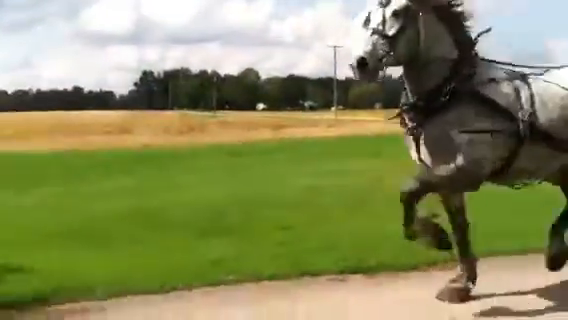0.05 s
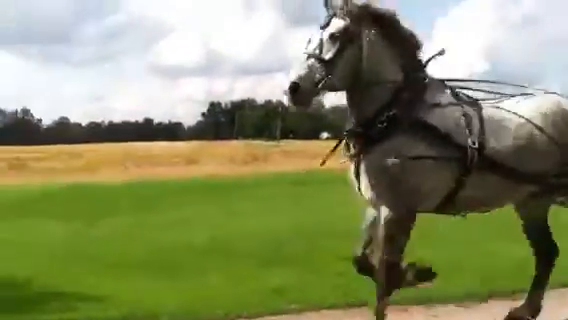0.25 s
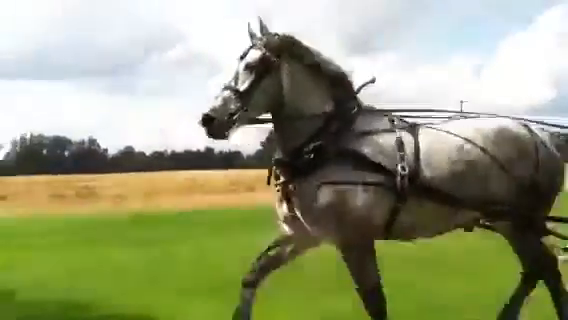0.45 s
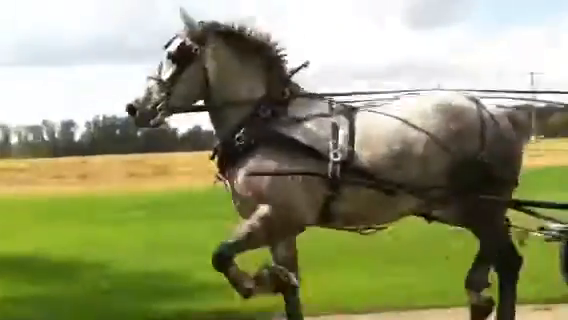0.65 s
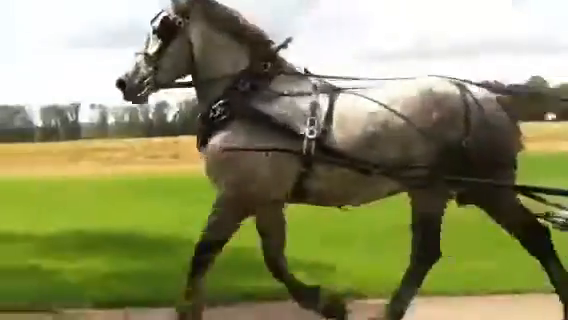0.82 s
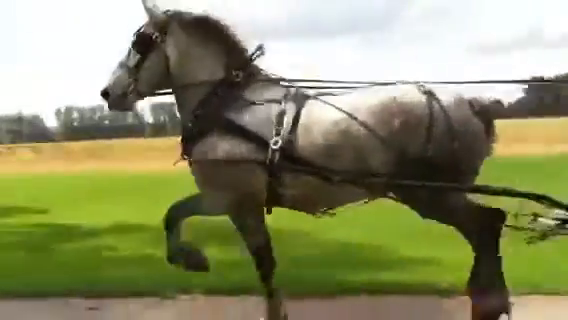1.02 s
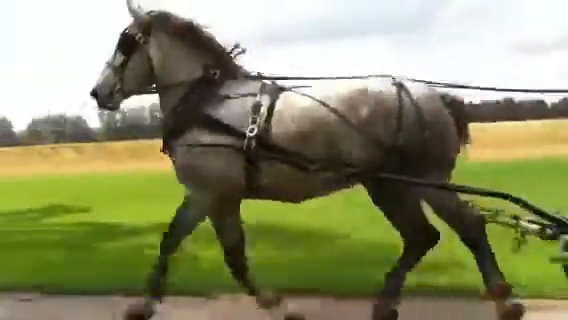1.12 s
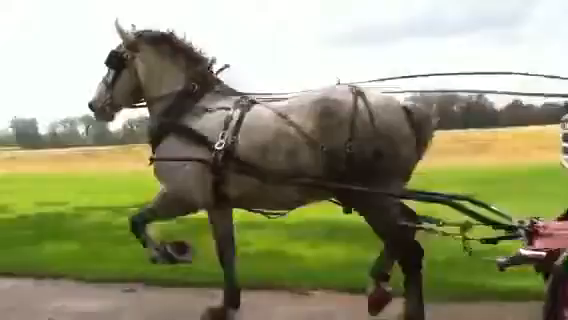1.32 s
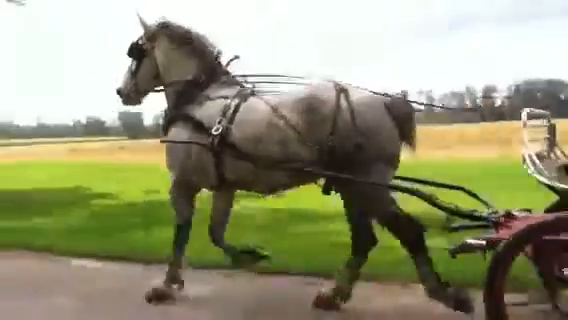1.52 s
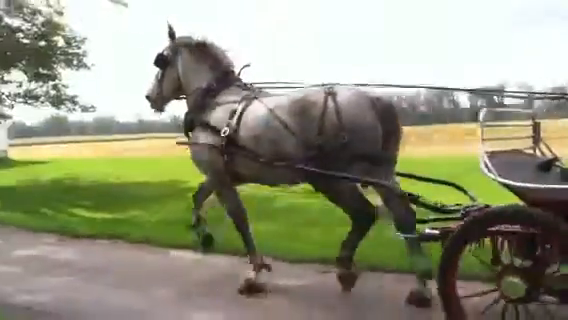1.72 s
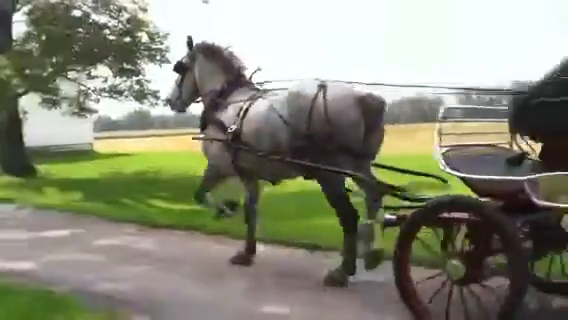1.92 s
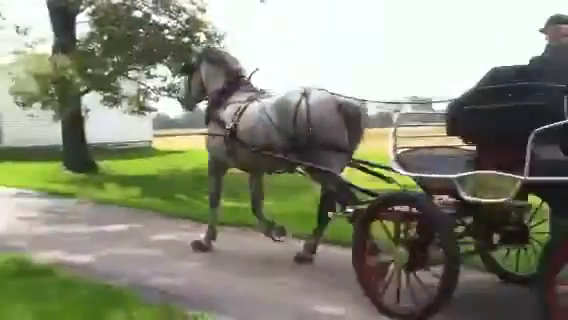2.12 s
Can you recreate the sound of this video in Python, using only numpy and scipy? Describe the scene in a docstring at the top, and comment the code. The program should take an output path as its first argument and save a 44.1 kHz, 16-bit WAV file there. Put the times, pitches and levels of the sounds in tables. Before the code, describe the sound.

Sharp trotting hoofbeats on a paved lane, over light harness jingle and steady wheel noise.

```python
"""Clip-clop: a horse in harness trots past on a paved lane, pulling a carriage. Each beat is a few quick hoof
contacts: a hollow knock, a clack of the hoof wall, a thud, a gritty tail. Small metal pieces on the harness
bump together, jingling and clinking with the stride. Underneath, the wheels roll steadily and crunch over small
grains. This background rumble dips briefly around 0.4 s and 1.7 s."""
import sys
import numpy as np
from scipy import signal
from scipy.fft import rfft, irfft, next_fast_len
from scipy.io import wavfile
from scipy.ndimage import uniform_filter1d, map_coordinates

SR = 44100
rng = np.random.default_rng(int(sys.argv[2]) if len(sys.argv) > 2 else 0)


def materialize(psi):
    """Save the field psi as 16-bit PCM at rate SR to the path in sys.argv[1].

    A 1-D psi becomes a single channel; in a 2-D psi each row is a channel.
    """
    bounded = np.clip(np.atleast_2d(psi).T, -1, 1)
    quanta = np.round(bounded * 32767).astype(np.int16)
    wavfile.write(sys.argv[1], SR, quanta)


N = 94815
T = np.arange(N) / SR

# Levels are relative. A mode is one of the tones an object rings with.
# hooves landing: t/s, hollow f/Hz, hollow level/dB, wall f/Hz, wall level/dB, thud level/dB
HOOF_CONTACTS = [(0.2271, 1100, -23.5, 1410, -19, -44), (0.2455, 760, -20, 1360, -24, -34.5),
                 (0.258, 894, -16.5, 1930, -25, -29.5), (0.2779, 961, -6.5, 1910, -15, -23.5),
                 (.5890, 820, -39, 2060, -35, -39), (.6040, 929, -8.5, 1830, -19, -61),
                 (0.6079, 696, -14.5, 2370, -20.5, -34), (0.6252, 970, -26.5, 1850, -28.5, -37.5),
                 (.8708, 930, -25.5, 2100, -25, -36), (0.8821, 916, -17.5, 1980, -42, -60),
                 (0.9122, 880, -49, 2300, -19, -32.5), (0.9326, 1013, -10, 2130, -11, -38),
                 (.9349, 707, -13.5, 2880, -11, -44), (1.22, 830, -22, 2170, -19.5, -41),
                 (1.2431, 735, -14.5, 1760, -23.5, -35), (1.2445, 1140, -13, 2120, -31, -56),
                 (1.2468, 716, -58, 2100, -14.5, -35.5), (1.2525, 1050, -19.5, 2190, -20, -41),
                 (1.2665, 940, -25, 1900, -30, -61), (1.5119, 870, -31, 2230, -25, -45),
                 (1.533, 845, -25.5, 1800, -31, -43), (1.567, 950, -30, 2360, -30, -37),
                 (1.5863, 835, -16, 1744, -10.5, -35.5), (1.868, 880, -36, 1880, -27, -43.5),
                 (1.8907, 810, -14, 2170, -18, -50), (1.8934, 784, -19.5, 2150, -15, -51),
                 (1.913, 820, -38, 1900, -46, -64)]
# modes of the hollow under the hoof: pitch ratio, level/dB, swell/s
KNOCK_MODES = [(0.991, 0.5, 0.0014), (1.4, -14.5, 0.002)]
# modes of the hard hoof wall: pitch ratio, level/dB, swell/s
CLACK_MODES = [(0.916, 4, 0.00061), (1.2, -11.5, 0.0017), (0.677, 1, 0.00038)]
# modes of the thud into the ground: f/Hz, level/dB, swell/s
GROUND_MODES = [(154.3, -3.5, 0.008), (257, -1, 0.0039), (473, 3, 0.0018)]
# gritty tail of a contact: f/Hz, level/dB
TAIL_SPECTRUM = [(60, -36), (250, -0.5), (520, -6), (900, 11.5), (2300, 0), (3500, -4), (6500, -9),
                 (14000, -31)]
# sound thrown back by horse and carriage: f/Hz, level/dB
ECHO_SPECTRUM = [(90, -34), (150, 8.5), (350, -5.5), (900, -0.5), (2200, -5.5), (7000, -66)]
# grit cracking under the shoes: t/s, level/dB
GRIT_CRACKS = [(0.259, -17), (0.608, -3), (0.8704, -18), (0.9324, -10), (0.9333, -16), (1.217, -20),
               (1.2459, -4), (1.8678, -21), (1.894, -12.5)]
# tone of a crack: f/Hz, level/dB
GRIT_SPECTRUM = [(100, -76), (2200, 8), (4000, -22), (5600, 3.5), (6400, 3.5), (7800, -9.5), (10000, -15.5),
                 (15000, -49)]
# buckles and straps clinking: t/s, f/Hz, level/dB
BUCKLE_HITS = [(0.042, 5720, -44), (0.0876, 7800, -42.5), (0.131, 7300, -44), (.185, 7860, -43),
               (0.5458, 2180, -43.5), (0.5615, 7800, -44), (0.736, 7520, -38.5), (0.845, 6800, -41),
               (1.0038, 2220, -38), (1.021, 7230, -34.5), (1.2013, 7500, -38.5), (1.331, 2320, -39.5),
               (1.335, 6850, -37), (1.3702, 7000, -38.5), (2.0112, 6840, -47)]
# modes of a buckle: pitch ratio, level/dB
BUCKLE_MODES = [(.8, -3), (0.998, 4.5), (1.13, -16), (1.48, -15)]
# modes of the jingling metal: f/Hz, level/dB, time to fade by 60 dB/s
METAL_MODES = [(4885, -3, .22), (4975, -6, .04), (5085, -5, .1), (5460, -6, .07), (9715, -2, .11),
               (9795, -2, .1), (9880, -8, .03), (10580, -6, .07), (10700, -4, .07), (10850, -12, .04),
               (13330, -10, .06), (13500, -17, .04)]
# rise and fall of the jingle: t/s, level/dB
JINGLE_CURVE = [(0, -62), (.12, -75), (.24, -44), (.34, -56.5), (.45, -65), (.55, -49.5), (.78, -63),
                (.89, -52.5), (1.0, -53), (1.08, -44.5), (1.16, -35.5), (1.24, -42), (1.30, -52.5),
                (1.40, -44.5), (1.48, -35.5), (1.575, -33.5), (1.62, -45.5), (1.765, -46.5), (1.795, -40.5),
                (1.89, -37), (1.98, -58), (2.15, -67.5)]
# noisy rattle within the jingle: f/Hz, level/dB
RATTLE_SPECTRUM = [(500, -50), (3500, -28), (5000, 13), (6500, 0), (8500, -6), (10200, -5.5), (11500, -43),
                   (15000, -40)]
# harder strikes on one piece of metal: t/s, f/Hz, level/dB
METAL_STRIKES = [(1.022, 4660, -45), (1.073, 4900, -35), (1.474, 9710, -27.5), (1.512, 5440, -35),
                 (1.57, 4868, -31), (1.783, 9700, -30.5)]
# wheels and open air: f/Hz, level/dB
ROLL_SPECTRUM = [(30, -1), (70, -18), (110, -1.5), (170, 6), (300, 7), (500, -1), (1200, 5), (2100, -3.5),
                 (3500, -11), (7800, -8.5), (15000, -46)]
# the background rumble rises and falls, with brief dips: t/s, level/dB
BACKGROUND_LEVEL = [(0, -50.5), (.2, -47.5), (.32, -52), (.45, -54.5), (.55, -49.5), (.97, -51),
                    (1.15, -46), (1.3, -50.5), (1.5, -49), (1.62, -51), (1.76, -54), (1.87, -48.5),
                    (2.0, -53.5)]
# grains under the rims: f/Hz, level/dB
CRUNCH_SPECTRUM = [(700, -1), (2100, 12), (3800, -7), (7500, -12), (10000, -16)]
# how fast the jingle and the background waver: f/Hz, level/dB
WAVER_SPECTRUM = [(3, -11), (25, -0.5), (150, -66)]


def hooves():
    """Each contact rings the hollow sole and hoof wall, thuds, and leaves a gritty tail and echoes."""
    sole_hz, sole_db = 887, -24.5  # the sole rings on after the knock
    tail_db, echo_db = -19.5, -34
    tones, tail_power, echo_power = np.zeros((3, N))
    for s, hollow_hz, hollow_db, wall_hz, wall_db, thud_db in HOOF_CONTACTS:
        for ratio, db, swell_s in KNOCK_MODES:
            add(tones, s, amp(hollow_db + db) * knock(s, hollow_hz * ratio, swell_s))
        for ratio, db, swell_s in CLACK_MODES:
            add(tones, s, amp(wall_db + db) * knock(s, wall_hz * ratio, swell_s))
        for hz, db, swell_s in GROUND_MODES:
            add(tones, s, amp(thud_db + db) * knock(s, hz, swell_s))
        add(tones, s, amp(hollow_db + sole_db) * knock(s, sole_hz, swell_s=0.0055))
        strength = amp(hollow_db) + amp(wall_db)
        add(tail_power, s, (strength ** 0.44 * burst(s, rise_s=0.00089, fall_s=0.0065)) ** 2)
        add(echo_power, s, (strength ** 0.28 * swell(s, swell_s=0.0068)) ** 2)
    tails = amp(tail_db) * np.sqrt(tail_power) * noise(TAIL_SPECTRUM)
    echoes = amp(echo_db) * np.sqrt(echo_power) * noise(ECHO_SPECTRUM)
    return tones + tails + echoes


def grit():
    """Grit cracks under the shoes: bright ticks, each with a faint short tail."""
    loudness = np.zeros(N)
    for s, db in GRIT_CRACKS:
        crack = burst(s, rise_s=0.00085, fall_s=0.0011)
        tail = amp(-37) * burst(s, rise_s=0.00042, fall_s=0.02)
        add(loudness, s, amp(db) * (crack + tail))
    return loudness * noise(GRIT_SPECTRUM)


def harness_jingle():
    """Many tiny collisions keep the metal pieces ringing and rattling."""
    hits = clicks(per_s=2800, spread_db=4.0)
    shimmer = np.zeros(N)
    for hz, db, fade_s in METAL_MODES:
        tone = ring(hits * rng.standard_normal(N), hz, fade_s)
        shimmer += amp(db) * rms_one(ring(tone, hz, fade_s=0.003))  # ringing twice makes it purer
    shimmer /= np.sqrt(uniform_filter1d(shimmer ** 2, size=600) + 1e-3)  # even out the loudness
    loudness = level(JINGLE_CURVE) * waver(depth_db=2)
    rattle = amp(-11.5) * noise(RATTLE_SPECTRUM)
    return loudness * (pass_by(shimmer) + rattle)


def metal_strikes():
    """A harder hit leaves one piece of metal ringing with a clear note above the jingle."""
    out = np.zeros(N)
    for s, hz, db in METAL_STRIKES:
        note = np.sin(2 * np.pi * hz * since(s))
        add(out, s, amp(db) * burst(s, rise_s=0.001, fall_s=0.045) * note)
    return out


def buckle_clinks():
    """Each short rattle of the harness stirs the clashing tones of one buckle."""
    out = np.zeros(N)
    for s, hz, db in BUCKLE_HITS:
        loudness = amp(db) * burst(s, rise_s=0.00027, fall_s=0.014)
        metal = np.zeros_like(loudness)
        for ratio, mode_db in BUCKLE_MODES:
            shaking = rng.standard_normal(len(metal))
            metal += amp(mode_db) * rms_one(ring(shaking, hz * ratio, fade_s=0.0039))
        add(out, s, loudness * rms_one(metal))
    return out


def wheels():
    """Steady rolling noise, with small grains crunching under the rims at many pitches."""
    grains_per_s, ring_cycles, crunch_db = 410, 56, -4
    grain_hz, grain_db = np.transpose(CRUNCH_SPECTRUM)
    pitches = np.geomspace(grain_hz[0], grain_hz[-1], 24)
    grains = np.zeros(N)
    for hz in pitches:
        hits = clicks(grains_per_s / len(pitches), spread_db=0.0)
        grains += amp(np.interp(hz, grain_hz, grain_db)) * ring(hits, hz, ring_cycles / hz)
    crunch = amp(crunch_db) * rms_one(cut_bass(grains, hz=500))
    return level(BACKGROUND_LEVEL) * waver(depth_db=1.38) * (noise(ROLL_SPECTRUM) + crunch)


def pass_by(sound):
    """The pitch sinks a little as the horse comes closer and then moves away (the Doppler effect)."""
    horse_m_per_s, sound_m_per_s, nearest_m, passing_s = 3.3, 343, 4.0, 1.0
    distance_m = np.hypot(nearest_m, horse_m_per_s * (T - passing_s))
    delay_s = (distance_m - nearest_m) / sound_m_per_s
    return map_coordinates(sound, [(T - delay_s) * SR], order=5, mode="mirror")


def amp(db):
    """Turn decibels into a number to multiply by."""
    return 10 ** (np.asarray(db) / 20)


def rms_one(x):
    """Scale a sound so that its average strength (rms) is 1."""
    return x / np.sqrt(np.mean(x ** 2) + 1e-20)


def noise(spectrum):
    """Noise of strength 1, its tone shaped by (f/Hz, level/dB) points."""
    hz, db = np.transpose(spectrum)
    size = next_fast_len(N)
    f = np.maximum(np.fft.rfftfreq(size, 1 / SR), 1)
    gain = amp(np.interp(np.log(f), np.log(hz), db))
    white = rfft(rng.standard_normal(N), size)
    return rms_one(irfft(white * gain, size)[:N])


def level(curve):
    """Loudness over time, joining up (t/s, level/dB) points."""
    return amp(np.interp(T, *np.transpose(curve)))


def waver(depth_db):
    """A quick, random wobble in loudness."""
    return amp(depth_db * noise(WAVER_SPECTRUM))


def since(s):
    """Seconds gone by since time s, for one short sound of 8192 samples."""
    return (np.arange(8192) + np.ceil(s * SR)) / SR - s


def burst(s, rise_s, fall_s):
    """A loudness shape that jumps up and fades."""
    return (1 - np.exp(-since(s) / rise_s)) * np.exp(-since(s) / fall_s)


def swell(s, swell_s):
    """A loudness shape that grows to 1 in swell_s seconds and dies away."""
    age = since(s) / swell_s
    return age * np.exp(1 - age)


def knock(s, hz, swell_s):
    """A tone that dies after only a few vibrations."""
    return swell(s, swell_s) ** 2 * np.sin(2 * np.pi * hz * since(s))


def clicks(per_s, spread_db):
    """Clicks at random times; spread_db makes their sizes uneven."""
    sizes = amp(spread_db * np.minimum(rng.exponential(1, N), 4))
    signs = rng.choice([-1, 1], N)
    return sizes * signs * (rng.random(N) < per_s / SR)


def ring(hits, hz, fade_s):
    """Each hit starts a tone that fades by 60 dB in fade_s seconds."""
    decay = np.exp(-np.log(1000) / (fade_s * SR))
    angle = 2 * np.pi * hz / SR
    return signal.lfilter([0, np.sin(angle)], [1, -2 * decay * np.cos(angle), decay ** 2], hits + 1e-18)


def cut_bass(sound, hz):
    """Weaken everything below hz."""
    return signal.sosfilt(signal.butter(2, hz, "high", fs=SR, output="sos"), sound)


def add(out, s, sound):
    """Mix a short sound in at time s."""
    i = int(np.ceil(s * SR))
    out[i:i + len(sound)] += sound[:N - i]


def scene():
    """Horse, harness and carriage together in one channel."""
    return (hooves() + grit() + buckle_clinks() + harness_jingle() + metal_strikes() + wheels())[None]


def record(dry):
    """Thin out the deep bass and cut off the highest treble."""
    top_hz = 15700
    treble_cut = signal.cheby2(12, 70, top_hz, fs=SR, output="sos")
    return signal.sosfilt(treble_cut, cut_bass(dry, hz=75))


dry = scene()
out = record(dry)
materialize(out)
```